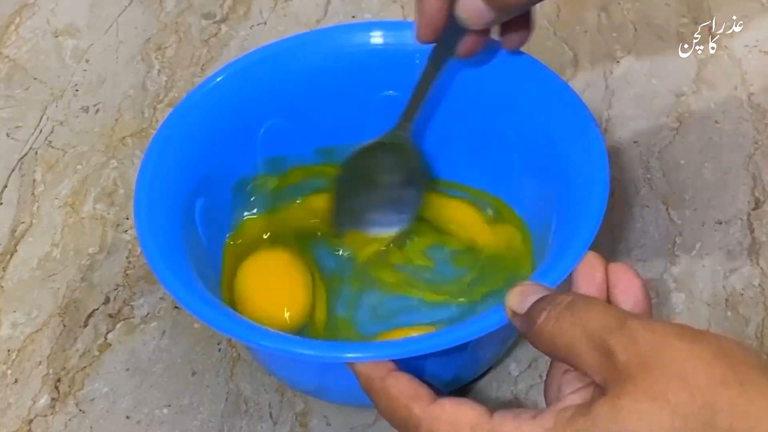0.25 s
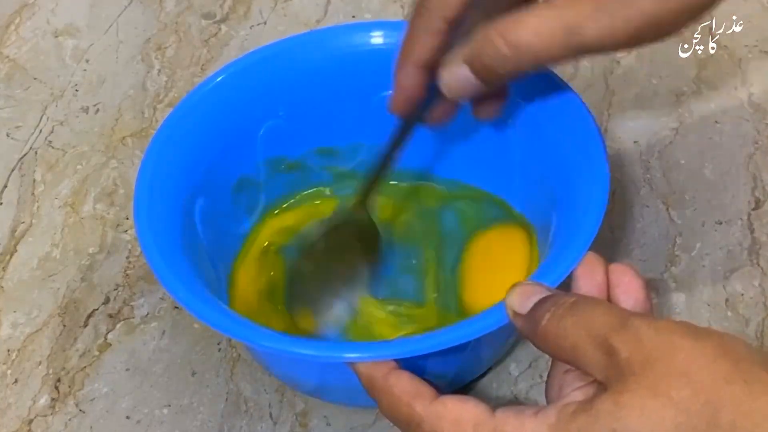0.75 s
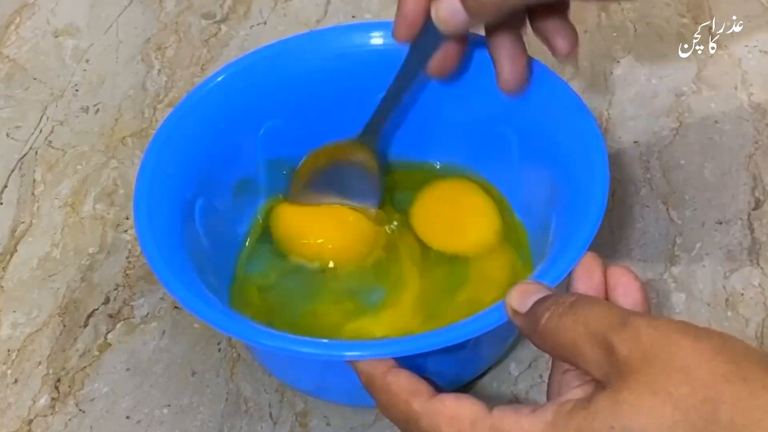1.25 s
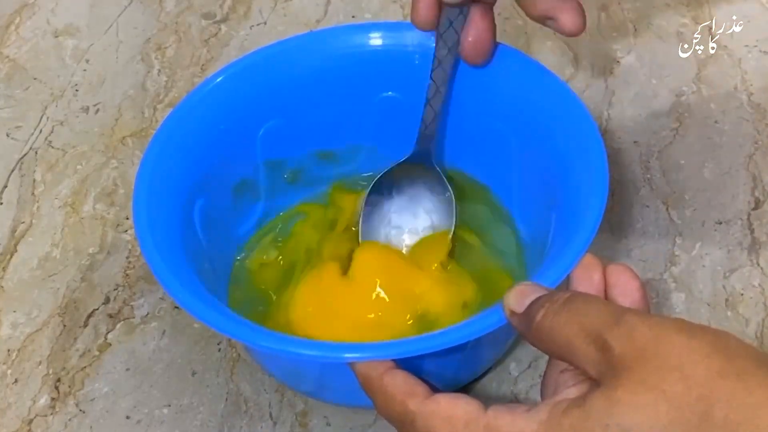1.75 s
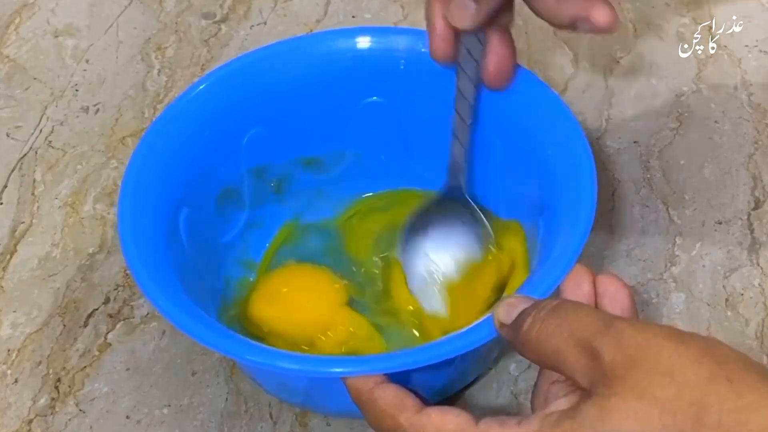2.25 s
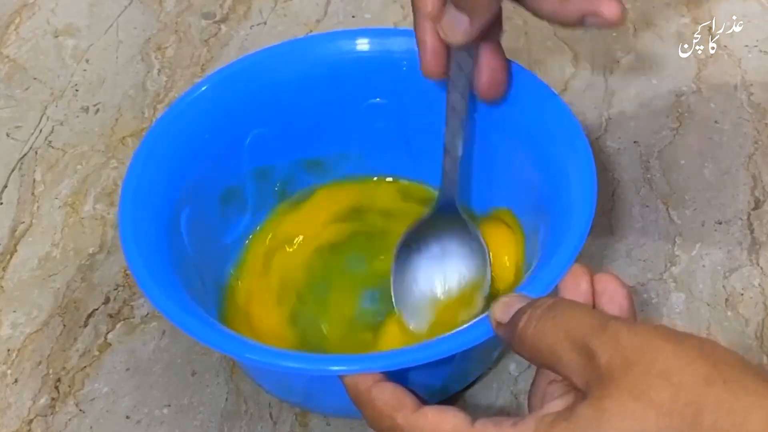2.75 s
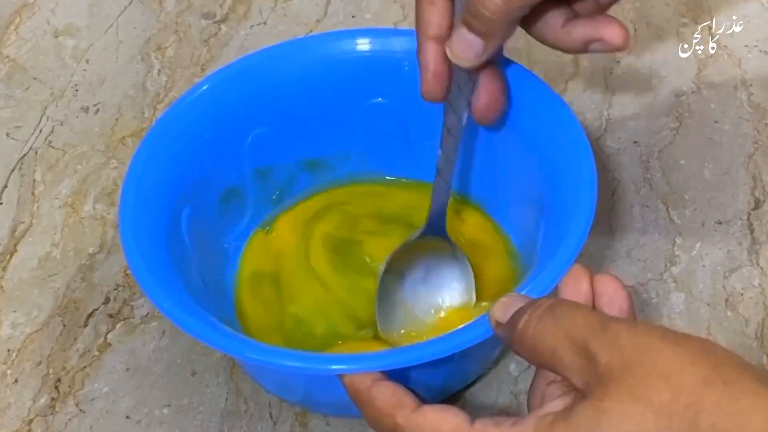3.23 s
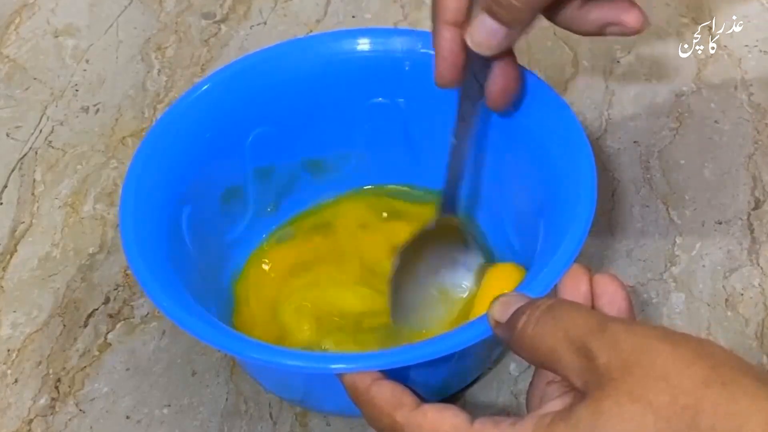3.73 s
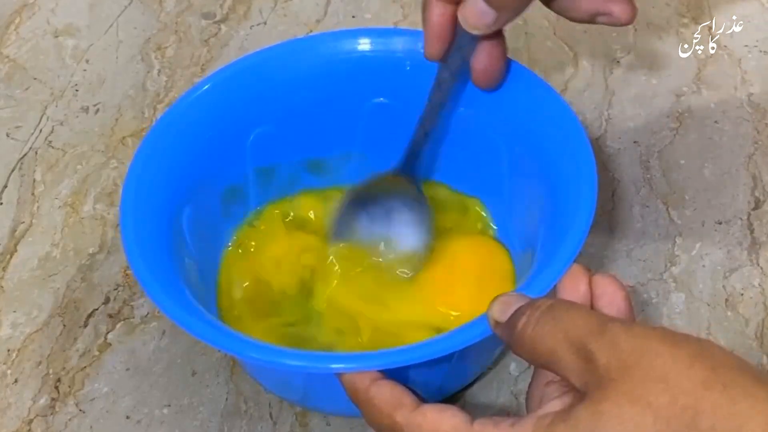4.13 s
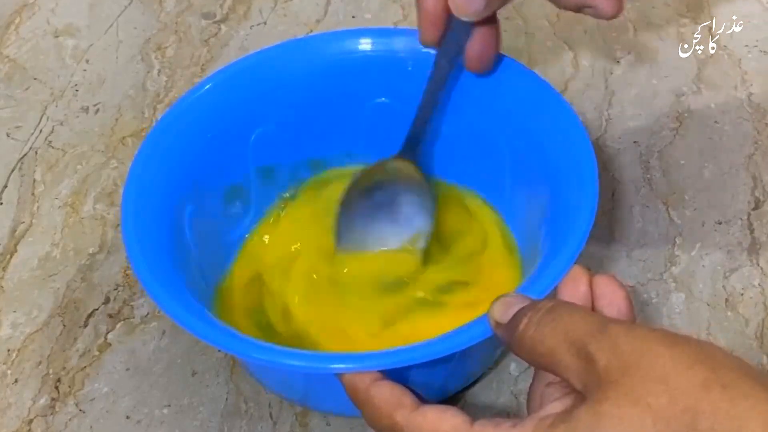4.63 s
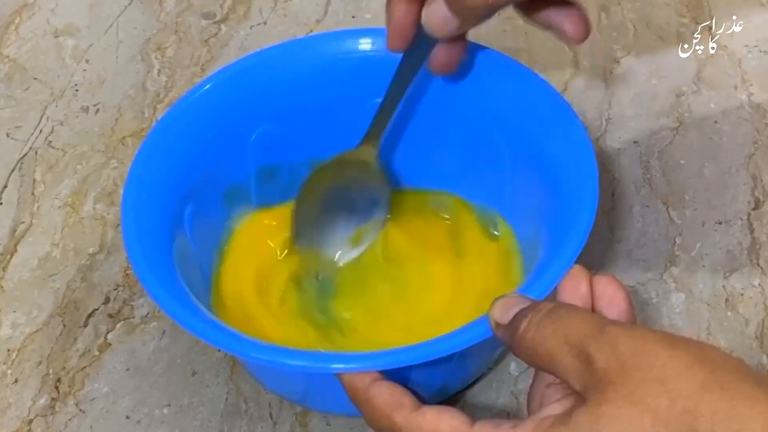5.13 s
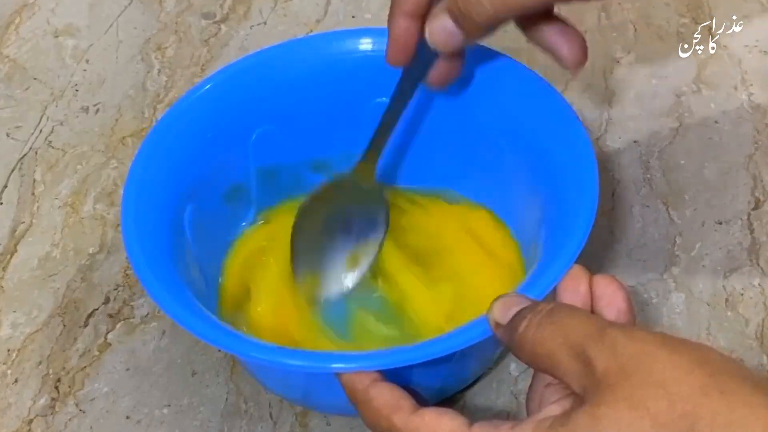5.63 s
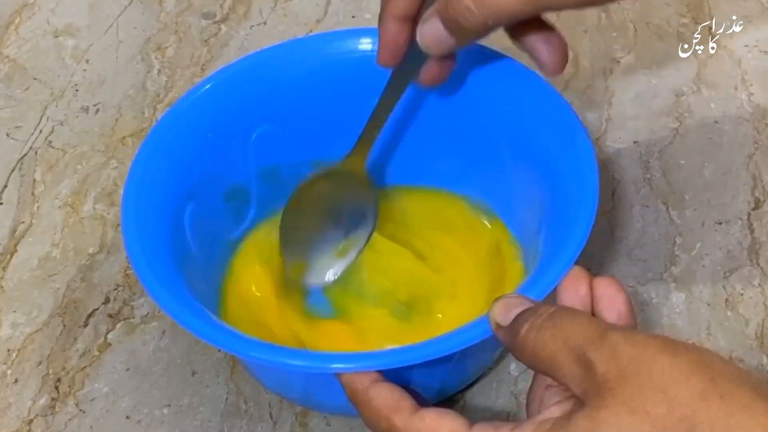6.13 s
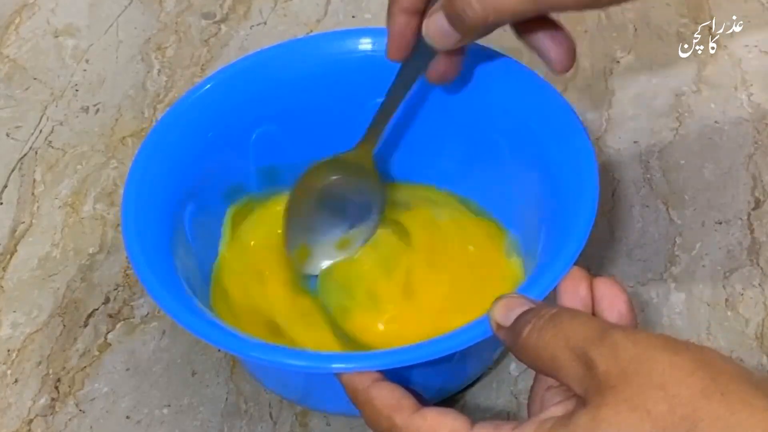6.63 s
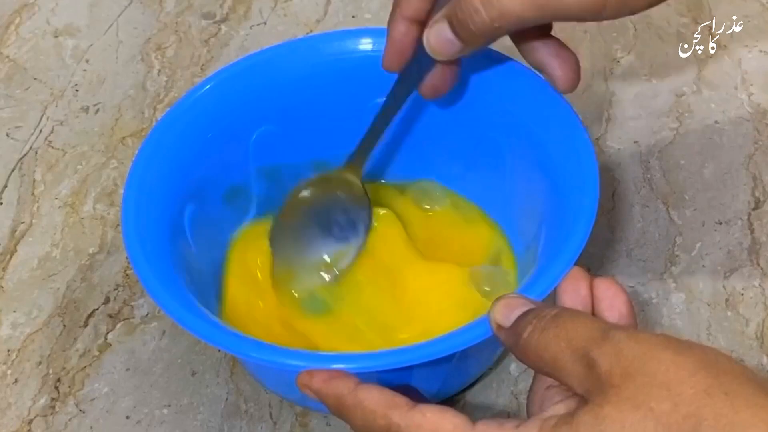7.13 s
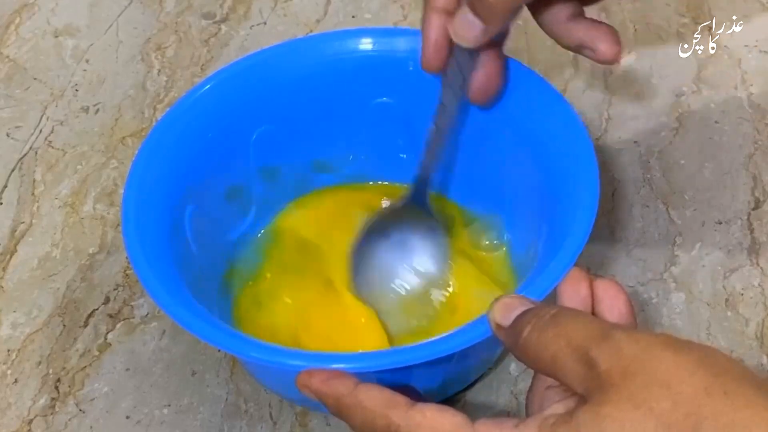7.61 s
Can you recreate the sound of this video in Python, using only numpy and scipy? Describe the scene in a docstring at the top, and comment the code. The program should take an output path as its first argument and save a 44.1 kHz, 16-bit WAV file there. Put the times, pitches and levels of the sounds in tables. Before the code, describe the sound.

A metal spoon briskly beats raw eggs in a thin plastic bowl, sharp ticks and hollow clacks over wet scraping in a quiet kitchen.

```python
"""Over a quiet room hum come a wet scrape and quick, sharp ticks: a metal spoon beats raw eggs in a thin
plastic bowl on a stone counter, close to a pair of microphones. Each tap is an impulse that sets resonances
of the bowl's hollow and wall ringing; between taps the spoon drags through the egg along the wall as a train
of random catches and noise. Plops from the egg are short rising tones, the bowl thuds softly on the counter,
and a hard kitchen answers with sparse, decaying echoes, over a steady faint treble hiss."""
import sys
import numpy as np
from scipy import signal
from scipy.fft import rfft, irfft
from scipy.io import wavfile
from scipy.ndimage import uniform_filter1d

SR = 44100
rng = np.random.default_rng(int(sys.argv[2]) if len(sys.argv) > 2 else 0)


def log_audio(samples):
    """Write samples as a 16-bit WAV file to the path given in sys.argv[1]."""
    # one column per channel
    frames = np.atleast_2d(samples).T
    # limit to full scale, then quantise
    limited = np.clip(frames, -1, 1)
    pcm = np.round(limited * 32767).astype(np.int16)
    wavfile.write(sys.argv[1], SR, pcm)


def makeup_ratio(level_db):
    """Linear amplitude ratio for a level in decibels (20 dB per factor of ten)."""
    decades = np.asarray(level_db, float) / 20
    return 10 ** decades


N = 347067  # samples

# Taps of the spoon; the faint row at 1.277 s is an early echo of the tap at 1.25 s, played as a further tap. #
# Each row: start in seconds, hollow level in dB, wall level in dB, edge tick level in dB, # wall pitch favoured
# by the spot struck in Hz.
SPOON_TAPS = [(0.077, -56, -50, -23, 5470), (0.23, -71, -49, -22, 4300), (0.24, -60, -38.5, -12, 2700),
              (0.362, -57, -50, -26, 4100), (0.439, -47, -44.5, -24, 5320), (0.478, -71, -53, -27, 4240),
              (0.589, -60, -37, -29.5, 2730), (0.714, -56, -42, -29, 2730), (0.739, -51.5, -49, -25, 1750),
              (0.772, -60, -57, -27, 4470), (0.875, -71, -41.5, -33, 3200), (0.929, -61, -51, -28, 4900),
              (0.97, -46.5, -32.5, -27, 1600), (1.08, -60, -42.5, -33, 1580), (1.25, -54, -25, -14.5, 1600),
              (1.277, -60, -31.5, -40, 3354), (1.418, -61, -47, -47, 4300), (1.437, -69, -45, -37.5, 1590),
              (1.485, -41, -37, -49, 1910), (1.501, -50, -42, -49, 1500), (1.515, -69, -52, -47, 3550),
              (1.567, -76, -40, -32, 3850), (1.667, -63, -44.5, -37, 3340), (1.694, -68, -42, -26.5, 1800),
              (1.737, -28, -27.5, -24.5, 2800), (1.778, -35, -54, -26, 3330), (1.828, -55, -36, -27, 2980),
              (1.843, -59, -41, -28, 1600), (1.889, -46, -42, -39, 2890), (2.092, -47, -28.5, -29.5, 2000),
              (2.146, -68, -42, -40, 1600), (2.209, -71, -47, -25.5, 4500),
              (2.298, -36, -29.5, -20.5, 5040), (2.304, -22.5, -23.5, -21.5, 1540),
              (2.337, -26.5, -21.5, -16.5, 2100), (2.372, -58, -49, -19.5, 1800),
              (2.425, -50, -44, -36, 2600), (2.49, -65, -45.5, -23.5, 3820), (2.565, -20, -20.5, -23, 2200),
              (2.598, -40, -24, -33, 2200), (2.624, -42, -38, -44, 2760), (2.715, -76, -54, -29.5, 4300),
              (2.804, -37, -31.5, -28, 1580), (2.809, -20, -16, -25, 1340), (2.82, -27.5, -46, -52, 1320),
              (2.832, -28.5, -34.5, -49, 1420), (2.857, -32, -27, -20, 2580),
              (2.879, -46, -26.5, -31, 1190), (2.925, -35, -34, -29, 1760), (2.976, -37, -40, -27, 1700),
              (3.039, -45, -37, -30, 1800), (3.05, -24, -17.5, -12.5, 1807), (3.096, -37, -22, -14.5, 1690),
              (3.261, -65, -42, -60, 1500), (3.335, -49, -33.5, -26.5, 2470),
              (3.391, -52, -40.5, -20.5, 1600), (3.547, -24.5, -12, -12, 1484),
              (3.565, -25.5, -34, -46, 1520), (3.59, -25, -17, -12, 3360), (3.623, -29, -31, -22, 2640),
              (3.636, -24, -15, -19, 1430), (3.642, -23.5, -28, -29, 2240), (3.662, -37, -27.5, -21, 2910),
              (3.702, -35, -28, -23.5, 2420), (3.839, -39, -22.5, -10.5, 3370),
              (3.881, -30, -18.5, -26, 1470), (3.889, -17.5, -13, -10.5, 1630),
              (3.903, -39, -47, -35, 2760), (3.91, -26, -37, -43, 1520), (3.925, -26, -27.5, -28, 3100),
              (4.013, -47, -31, -13.5, 4150), (4.075, -23, -21.5, -28.5, 1460),
              (4.083, -26.5, -25, -27, 1590), (4.144, -22, -22.5, -21.5, 1430),
              (4.151, -23, -23.5, -28, 1350), (4.175, -25, -31, -37, 1140),
              (4.202, -18.5, -18.5, -13, 1630), (4.347, -23.5, -14.5, -12, 1560),
              (4.374, -40, -29, -19, 3940), (4.444, -29.5, -29, -24, 1790), (4.589, -38, -19.5, -24, 1460),
              (4.595, -22, -19.5, -32, 1635), (4.613, -22.5, -26, -37, 1600), (4.627, -28, -33, -40, 2720),
              (4.64, -54, -28, -23, 2900), (4.662, -24.5, -23.5, -30, 1620), (4.693, -46, -25.5, -39, 1880),
              (4.724, -30.5, -32.5, -23, 2560), (4.837, -52, -31.5, -27.5, 1460),
              (4.916, -35.5, -34.5, -17.5, 1870), (4.992, -25, -24, -20, 1580), (5.0, -32, -44, -39, 2440),
              (5.08, -71, -43, -27.5, 4300), (5.152, -70, -40, -18.5, 1850), (5.363, -70, -37, -33, 2460),
              (5.433, -75, -45.5, -16.5, 3540), (5.525, -30.5, -26, -19, 2200),
              (5.57, -69, -39.5, -26, 2720), (5.607, -62, -36, -23.5, 1550), (5.622, -68, -37, -26, 3000),
              (5.704, -32, -35.5, -23, 2430), (5.815, -64, -44.5, -25.5, 4730),
              (5.919, -67, -39, -26, 2430), (5.928, -67, -40.5, -16, 2850), (5.969, -68, -35, -12.5, 2930),
              (6.019, -72, -46, -24.5, 3300), (6.075, -72, -51, -30, 2550), (6.087, -69, -38.5, -36, 2700),
              (6.174, -66, -49, -22, 2770), (6.194, -60, -45, -50, 1130), (6.22, -28.5, -21, -20, 1740),
              (6.235, -30, -27, -33, 1430), (6.279, -45, -33.5, -21.5, 4230),
              (6.333, -63, -40, -22.5, 3640), (6.447, -26.5, -29, -26.5, 3070),
              (6.465, -31, -31, -42, 1600), (6.489, -53, -53, -46, 1900), (6.514, -63, -44, -30, 3300),
              (6.57, -71, -43, -25, 3140), (6.669, -80, -44, -24, 4200), (6.698, -26.5, -28, -29, 1570),
              (6.707, -20, -21, -16.5, 1580), (6.715, -30, -25, -33, 1650), (6.744, -24, -21, -23.5, 1610),
              (6.765, -40, -42, -23, 1740), (6.807, -56, -45, -17.5, 1950), (6.937, -39, -38, -20, 1920),
              (6.944, -41, -33, -47, 1550), (6.952, -25, -23, -22, 1240), (6.975, -37, -15, -18.5, 1250),
              (6.992, -29.5, -51, -48, 1610), (7.02, -48, -26, -42, 1210), (7.075, -63, -32, -19, 4300),
              (7.169, -60.5, -39, -22, 2440), (7.231, -69, -49, -33, 3250), (7.273, -70, -45, -25.5, 5030),
              (7.33, -65, -29.5, -16.5, 3960), (7.353, -52, -29, -21, 3930), (7.404, -71, -39.5, -33, 1640),
              (7.457, -68, -37, -9.5, 3060), (7.472, -71, -53, -20, 3150), (7.514, -68, -38, -27.5, 3340),
              (7.691, -68, -43, -54, 2750), (7.729, -66, -34.5, -10, 4570), (7.783, -71, -39, -28, 3170)]
# Sweeps through the egg. Each row: start in seconds, pressure on the wall in dB, wet hiss of the spoon edge
# in dB, pitch it leaves the hollow with in Hz (before the wobble).
STROKES_THROUGH_EGG = [(0.0, -61, -50.5, 780), (0.23, -70, -56.5, 780), (0.43, -59, -49, 770),
                       (0.72, -63, -48, 810), (0.97, -59, -61, 802), (1.25, -51, -50.5, 767),
                       (1.481, -48, -51, 810), (1.719, -41, -47.5, 790), (2.085, -57, -53, 840),
                       (2.29, -41.5, -44, 805), (2.548, -39.5, -50.5, 847), (2.8, -52, -57, 853),
                       (3.041, -37, -46, 866), (3.37, -54, -54, 890), (3.54, -34.5, -60, 804),
                       (3.62, -48, -68, 784), (3.881, -37, -52, 868), (4.06, -47, -61, 900),
                       (4.13, -49, -64, 886), (4.19, -40.5, -73, 693), (4.34, -46, -60, 818),
                       (4.43, -68, -79, 900), (4.58, -38.5, -45.5, 818), (4.71, -69, -72, 727),
                       (4.9, -64, -61, 875), (4.981, -56, -53, 718), (5.14, -56, -55.5, 710),
                       (5.41, -66, -69, 710), (5.51, -57, -48, 678), (5.69, -55, -50.5, 760),
                       (5.85, -56, -56, 795), (5.96, -77, -47, 810), (6.21, -41.5, -42, 880),
                       (6.44, -44, -53, 837), (6.69, -42, -54, 770), (6.73, -49, -51, 739),
                       (6.93, -40, -63, 805), (6.965, -39.5, -47, 715), (7.25, -56.5, -55, 717),
                       (7.325, -52, -52, 740), (7.45, -68, -76, 710), (7.72, -51, -54, 706)]
# Modes of the whole wall. Each row: frequency in Hz (before detuning), width in Hz, relative level in dB.
WALL_MODES = [(934, 35, -11), (1250, 155, -4), (1500, 167, -1.5), (1600, 128, -3), (1870, 310, -8),
              (2266, 205, -5), (2700, 397, 0), (2970, 240, -3), (3574, 136, -4.5), (4300, 390, -0.5),
              (5200, 730, -3.5), (6130, 1170, -1)]
# Resonance of the patch struck, by its pitch. Each row: from in Hz, to in Hz, width in Hz, level in dB.
PATCH_RESONANCES = [(1000, 2000, 133, 1), (2200, 6000, 385, 5.5)]
# The many dense wall modes under a drag. Each row: frequency in Hz, gain in dB.
RASP_SPECTRUM = [(500, 1.5), (900, 4), (1600, 1.5), (3200, 3.5), (4800, -3.5), (7000, -52)]
# Steel edge striking plastic. Each row: frequency in Hz, gain in dB.
TICK_SPECTRUM = [(1500, -24), (4000, -28), (7000, -15.5), (9000, -6), (11000, -11), (13000, -16),
                 (15000, -14), (17000, -48)]
# Spoon edge sliding through wet egg, and the steady hiss. Each row: frequency in Hz, gain in dB.
HISS_SPECTRUM = [(1500, -23), (4000, -32), (7000, -5), (9000, -8.5), (11000, -6), (12500, -20),
                 (13500, -10), (15000, -23), (16500, -45)]
# Short rising tones from the egg, a few of them likely early echoes of the one before.
# Each row: start in seconds, level in dB, starting pitch in Hz, width in Hz.
PLOP_TONES = [(0.588, -37.5, 2700, 250), (1.694, -29.5, 1740, 121), (1.712, -42, 1660, 120),
              (2.977, -30, 1740, 111), (3.335, -30, 2480, 250), (5.967, -29.5, 2760, 250),
              (7.33, -27.5, 1990, 250), (7.458, -20.5, 3100, 350), (7.49, -33, 3160, 350),
              (7.74, -44, 1840, 100)]
# The bowl rocks onto the counter. Each row: start in seconds, relative level in dB, pitch in Hz.
COUNTER_BUMPS = [(1.261, -44.5, 146), (2.098, -55, 278), (2.306, -51, 250), (2.813, -49, 273),
                 (3.053, -56, 279), (3.551, -47, 268), (3.666, -47.5, 277), (3.889, -41.5, 273),
                 (4.082, -49, 292), (4.203, -44, 278), (4.443, -54, 273), (4.727, -50, 268),
                 (4.991, -50, 275), (5.529, -48.5, 298), (6.227, -53, 273), (6.469, -44.5, 269),
                 (6.706, -43.5, 267), (6.966, -44.5, 290)]
# Decay of the echoes. Each row: frequency in Hz, time to fall by 60 dB in seconds.
KITCHEN_DECAY = [(250, 0.64), (700, 0.34), (1700, 0.25), (4500, 0.28), (10000, 0.31)]
# Air and house noise. Each row: frequency in Hz, relative spectrum level in dB per Hz.
HUM_SPECTRUM = [(15, -6), (25, 3.5), (199, -1.5), (418, -6), (494, -9.5), (723, -8.5), (777, -9),
                (1190, -9.5), (1450, -10), (2500, -13), (2750, -13), (7500, -17.5), (9750, -44),
                (16500, -120)]
# Gain of the microphones. Each row: frequency in Hz, gain in dB.
MICROPHONE_GAIN = [(20, -24), (48, -5), (6500, -2.5), (7800, -3), (7950, 15), (12500, 4.5), (16500, -6)]
# Microphone pair. Each row: frequency in Hz, share of the left-right difference kept, phase by which the left
# leads in radians, left-right level difference in dB.
MICROPHONE_PAIR = [(0, .012, 0, 0), (850, .03, 0, 0), (1300, .4, .1, 0), (1800, .75, .3, .5),
                   (2600, .9, .7, 1.6), (5000, 1.2, .4, 1.8), (7000, .5, -.1, .3), (7800, .4, -1.4, .1),
                   (7950, .3, -1.7, .1), (16500, .9, -14.2, .1)]

# a tap reaches wall modes far from its spot more weakly
BELOW_DB_PER_OCTAVE, ABOVE_DB_PER_OCTAVE = 7.5, 5.5
HOLLOW_WIDTH_HZ, WALL_FROM_HZ = 60.4, 1100  # modes below WALL_FROM_HZ take the hollow level of a tap
# a stroke bites quickly, then eases off
BITE_S, EASE_DB_PER_S, HISS_EASE_DB_PER_S = 0.023, 124, 58.5
# over the drag: small chance taps on the wall, and specks, chance ticks of the edge
RATTLE_PER_S, RATTLE_DB = 60, -20
SPECK_PER_S, SPECK_DB, SPECK_SPREAD_DB = 14, 18.5, 5
# sloshing egg shakes the pitch of hollow and patch: rms share of the pitch, and smoothing window
WOBBLE_SHARE, WOBBLE_S = 0.04, 0.013
# the edge scuffs the wall around each tap
SCUFF_DB, SCUFF_IN_S, SCUFF_OUT_S = -29, 0.0024, 0.0033
PITCH_EARLY_S = 0.003  # a new pitch is set just ahead of its blow
PLOP_RISE_PER_S = 6.4  # share of the starting pitch gained per second


def bowl():
    """Forced vibration: taps and drag excite the hollow, the patch under the spoon and the whole wall."""
    catches = grit(1200, spread_db=6.0)
    pressure = drag(column=1, ease_db_per_s=EASE_DB_PER_S)
    rub = pressure * catches
    rattle = makeup_ratio(RATTLE_DB) * pressure * grit(RATTLE_PER_S, spread_db=6.5)
    window = np.hanning(round(WOBBLE_S * SR))[None]
    wander = signal.oaconvolve(rng.standard_normal((2, N)), window, "same")
    slosh = 1 + WOBBLE_SHARE * evened(wander)
    return (hollow(catches, rub, rattle, slosh[0]) + patch(catches, rub, slosh[1])
            + coloured(rub, RASP_SPECTRUM) + wall(catches, rattle))


def hollow(catches, rub, rattle, slosh):
    """Cavity resonance: the hollow rings at one pitch, which each stroke through the egg resets."""
    start_s, _, _, pitch_hz = np.transpose(STROKES_THROUGH_EGG)
    drive = landing(part(0), -27.5, catches) + makeup_ratio(-46.0) * rub + makeup_ratio(-14.5) * rattle
    return makeup_ratio(2.5) * ring(drive, slosh * held(start_s, pitch_hz), HOLLOW_WIDTH_HZ, rise_hz=189)


def patch(catches, rub, slosh):
    """Local resonance: the spot struck rings at its own pitch, with a width set by its pitch range; a spot
    whose pitch lies in no range, as between 2000 and 2200 Hz, stays silent."""
    start_s, _, _, _, spot_hz = np.transpose(SPOON_TAPS)
    patch_hz = held(start_s - PITCH_EARLY_S, spot_hz)
    drive = landing(part(spot_hz), -30.5, catches) + makeup_ratio(-38) * rub
    out = np.zeros(N)
    for from_hz, to_hz, width_hz, db in PATCH_RESONANCES:
        in_range = (patch_hz >= from_hz) & (patch_hz < to_hz)
        out += makeup_ratio(db) * ring(drive * in_range, slosh * patch_hz, width_hz, rise_hz=3.0 * width_hz)
    return out


def wall(catches, rattle):
    """Modal superposition: each tap drives every wall mode with its own strength, sign and detuning."""
    start_s = np.array(SPOON_TAPS)[:, 0]
    out = np.zeros(N)
    for hz, width_hz, db in WALL_MODES:
        strength, sign, detuning = rng.standard_normal((3, len(SPOON_TAPS)))
        size = part(hz) * makeup_ratio(2.93 * strength) * np.sign(sign)  # every tap lands on another spot
        # sloshing egg and the holding hand detune the wall
        loaded_hz = held(start_s - PITCH_EARLY_S, hz * (1 + 0.069 * detuning))
        drive = landing(size, -19.0, catches) + rattle
        out += makeup_ratio(db) * ring(drive, loaded_hz, width_hz, rise_hz=0.26 * hz)
    return out


def landing(size, skid_db, catches):
    """Impact with friction: the blow of each tap and the rubbing around it."""
    blows = clicks(SPOON_TAPS, size)
    return blows + makeup_ratio(skid_db) * skid(blows, 0.0036, 0.0064) * np.clip(catches, -6, 6)


def part(hz):
    """Coupling: the share of each tap that reaches the pitch hz falls with distance from its spot."""
    _, hollow_db, wall_db, _, spot_hz = np.transpose(SPOON_TAPS)
    octaves = np.log2(np.maximum(hz, 1) / spot_hz)
    slope = np.where(octaves < 0, BELOW_DB_PER_OCTAVE, ABOVE_DB_PER_OCTAVE)
    return makeup_ratio(np.where(hz < WALL_FROM_HZ, hollow_db, wall_db - slope * abs(octaves)))


def spoon():
    """Impact and friction noise: steel ticks on plastic in short bursts, and hisses in puffs as it slides."""
    slide = drag(column=2, ease_db_per_s=HISS_EASE_DB_PER_S)
    speck_size = makeup_ratio(SPECK_DB + SPECK_SPREAD_DB * np.clip(rng.standard_normal(N), -2, 2))
    specks = slide * speck_size * (rng.random(N) < SPECK_PER_S / SR)
    edge = clicks(SPOON_TAPS, makeup_ratio(np.array(SPOON_TAPS)[:, 3])) + specks

    burst = 0.5 * skid(edge, 0.00039, 0.0023) + 0.13 * skid(edge, 0.00092, 0.006)
    burst += makeup_ratio(SCUFF_DB) * skid(edge, SCUFF_IN_S, SCUFF_OUT_S)
    ticks = makeup_ratio(14.0) * edge + makeup_ratio(-1.0) * burst * rng.standard_normal(N)

    slow_noise = uniform_filter1d(uniform_filter1d(rng.standard_normal(N), 500), 500)
    puffs = makeup_ratio(3.0 * evened(slow_noise))
    hiss = slide * puffs * (0.7 * grit(1500, spread_db=6.0) + 0.8 * rng.standard_normal(N))
    hiss_floor = makeup_ratio(-57) * rng.standard_normal(N)  # steady faint treble hiss under everything
    return coloured(ticks, TICK_SPECTRUM) + coloured(hiss + hiss_floor, HISS_SPECTRUM)


def egg():
    """Damped oscillation: each plop is a short tone that swells softly, climbs in pitch and dies."""
    out, t = np.zeros(N), np.arange(2200) / SR
    for start_s, db, hz, width_hz in PLOP_TONES:
        fade = np.exp(-np.pi * width_hz * t)
        tone = np.sin(2 * np.pi * hz * (t + PLOP_RISE_PER_S * t ** 2 / 2))
        out[round(start_s * SR):][:len(t)] += makeup_ratio(db) * 4 * fade * (1 - fade) * tone
    return out


def counter():
    """Damped resonance: each rock of the bowl onto the stone is a short soft thud."""
    start_s, db, hz = np.transpose(COUNTER_BUMPS)
    thud_hz = held(start_s - PITCH_EARLY_S, hz)
    return makeup_ratio(12.5) * ring(clicks(COUNTER_BUMPS, makeup_ratio(db)), thud_hz, 32, rise_hz=72)


def kitchen(x):
    """Reverberation: sparse echoes of random sign, each band dying at its own speed."""
    echoes = np.zeros((3, 2, SR))  # three sets, two microphones, one second
    # one echo in every 20 samples
    at = np.arange(120, SR - 20, 20) + rng.integers(0, 20, (3, 2, (SR - 121) // 20))
    np.put_along_axis(echoes, at, rng.choice([-1., 1.], at.shape), 2)
    echoes *= 1 - 0.78 * np.exp(-np.arange(SR) / (0.025 * SR))  # the walls are far: echoes build up
    hz, t, bands = signal.stft(echoes, SR, nperseg=256)
    decay = makeup_ratio(-60 * t / read(KITCHEN_DECAY, hz)[:, None])
    tail = signal.istft(bands * decay, SR, nperseg=256)[1]
    tail /= np.linalg.norm(tail[0, 0])
    # the three random echo sets fade into one another in turn, at 1.3 Hz, keeping the tail even
    cycles = 1.3 * np.arange(N) / SR + np.arange(3)[:, None, None] / 3
    turns = np.cos(2 * np.pi * cycles) * np.sqrt(2 / 3)
    return signal.oaconvolve(x * turns, tail, axes=2).sum(0)[:, :N]


def hum():
    """Stationary noise: steady air and house noise, independent at each microphone."""
    return makeup_ratio(-52) * evened(coloured(rng.standard_normal((2, N)), HUM_SPECTRUM))


def drag(column, ease_db_per_s):
    """Friction force: strength of the stirring hand, as every stroke bites and eases off exponentially."""
    level_db, t = np.array(STROKES_THROUGH_EGG)[:, column], np.arange(SR) / SR
    shape = np.minimum(t / BITE_S, 1) * makeup_ratio(-ease_db_per_s * np.maximum(t - BITE_S, 0))
    return abs(signal.oaconvolve(clicks(STROKES_THROUGH_EGG, makeup_ratio(level_db)), shape)[:N])


def grit(per_s, spread_db):
    """Stick-slip: the spoon edge catches at random moments, a few catches much harder; rms 1."""
    size = makeup_ratio(spread_db * np.minimum(rng.exponential(1, N), 4)) * rng.choice([-1., 1.], N)
    return evened(size * (rng.random(N) < per_s / SR))


def skid(train, before_s, after_s):
    """Contact friction: the rub grows just before each landing and its chatter decays just after."""
    grow, fade = np.exp(-1 / (SR * np.array([before_s, after_s])))
    before = signal.lfilter([1], [1, -grow], abs(train[::-1]))[::-1]
    after = signal.lfilter([1], [1, -fade], abs(train))
    return before + after


def ring(x, hz, width_hz, rise_hz):
    """Damped resonance on the pitch curve hz: swells as fast as rise_hz allows, dies as slowly as width_hz."""
    turn = np.exp(2j * np.pi * np.cumsum(hz * np.ones(N)) / SR)
    fade, swell = np.exp(-np.pi * np.array([width_hz, rise_hz]) / SR)
    # the envelope is filtered at zero frequency, then turned back up to the pitch
    envelope = signal.lfilter([1 - swell], np.convolve([1, -fade], [1, -swell]), x / turn)
    return (turn * envelope).real


def clicks(rows, size):
    """Impulse excitation: one click at the moment of each row."""
    train = np.zeros(N)
    np.add.at(train, np.round(np.array(rows)[:, 0] * SR).astype(int), size)
    return train


def held(start_s, values):
    """Sample and hold: each value lasts from its moment until the next."""
    return values[np.maximum(np.searchsorted(start_s, np.arange(N) / SR) - 1, 0)]


def evened(x):
    """Normalisation: scales to rms 1."""
    return x / np.sqrt(np.mean(x ** 2) + 1e-20)


def read(points, hz):
    """Interpolation of a spectrum on a log-frequency axis."""
    f, value = np.transpose(points)
    return np.interp(np.log(hz + 1), np.log(f + 1), value)


def coloured(x, points):
    """Linear filtering by a spectrum in dB."""
    gain = makeup_ratio(read(points, np.fft.rfftfreq(x.shape[-1], 1 / SR)))
    return irfft(rfft(x) * gain, x.shape[-1])


def scene():
    """Superposition: bowl, egg and spoon with their echoes, the counter and the room noise."""
    ringing, steel = bowl() + egg(), spoon()
    echoes = kitchen(makeup_ratio(-1.5) * ringing + makeup_ratio(-11) * steel)
    return ringing + steel + counter() + echoes + hum()


def band_limit(x):
    """A steep low-pass at the top of the band."""
    return signal.sosfilt(signal.butter(12, 16990, fs=SR, output="sos"), x)


def record(dry):
    """Stereo pickup: nearly mono bass; lifted treble that reaches the right a quarter millisecond early."""
    f, *columns = np.transpose(MICROPHONE_PAIR)
    kept, lead, tilt_db = (np.interp(np.fft.rfftfreq(N, 1 / SR), f, c) for c in columns)
    left, right = rfft(coloured(dry, MICROPHONE_GAIN))
    mid, side = (left + right) / 2, kept * (left - right) / 2
    turn = makeup_ratio(tilt_db / 2) * np.exp(.5j * lead)  # half the difference goes to each microphone
    pair = irfft(np.array([(mid + side) * turn, (mid - side) / turn]), N)
    return band_limit(pair)


dry = scene()
out = record(dry)
log_audio(out)
```